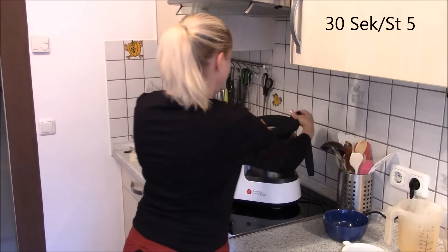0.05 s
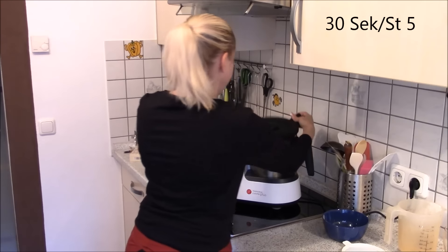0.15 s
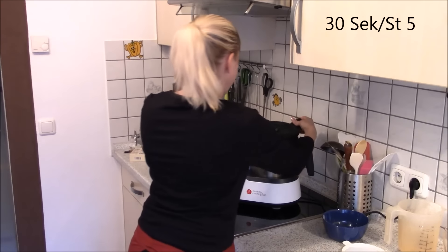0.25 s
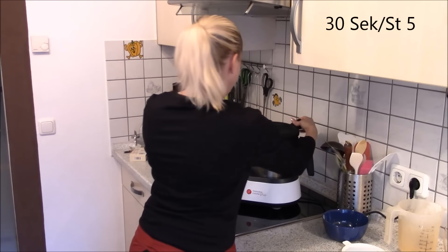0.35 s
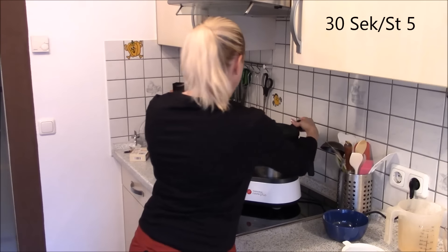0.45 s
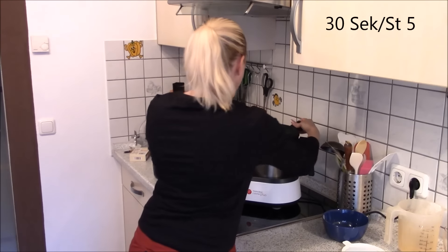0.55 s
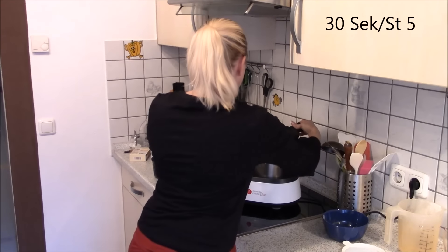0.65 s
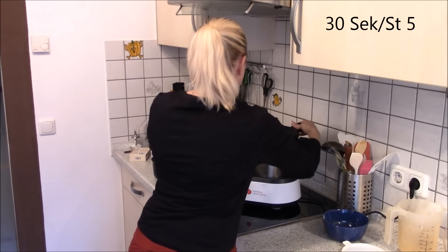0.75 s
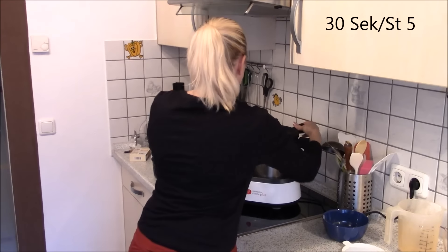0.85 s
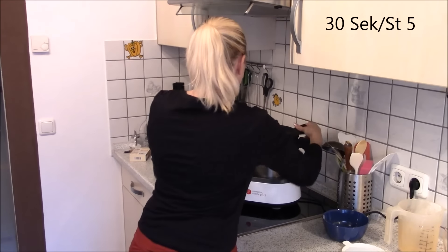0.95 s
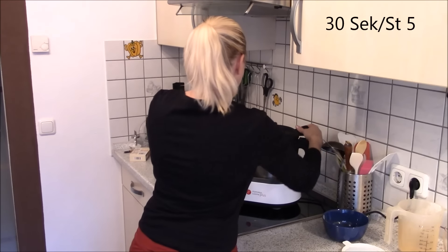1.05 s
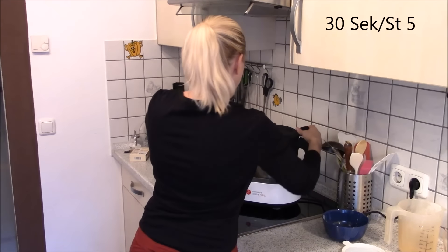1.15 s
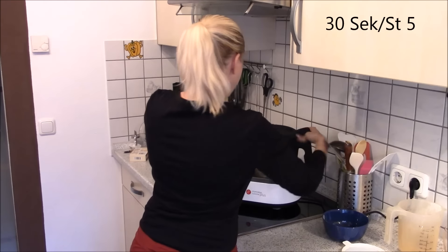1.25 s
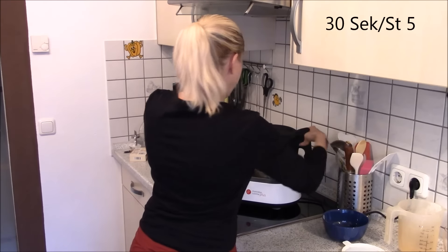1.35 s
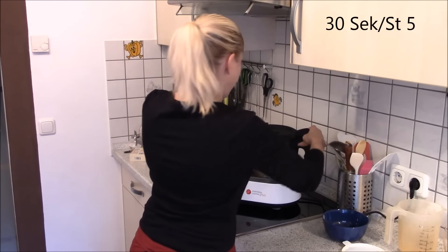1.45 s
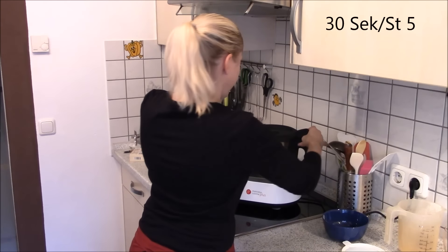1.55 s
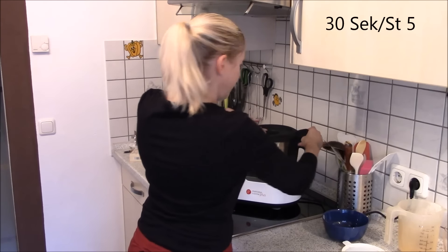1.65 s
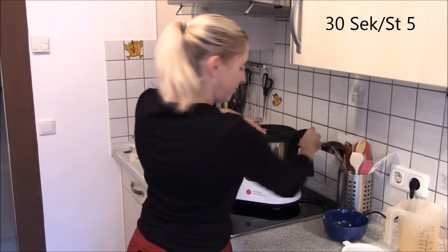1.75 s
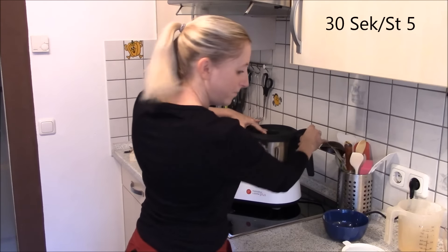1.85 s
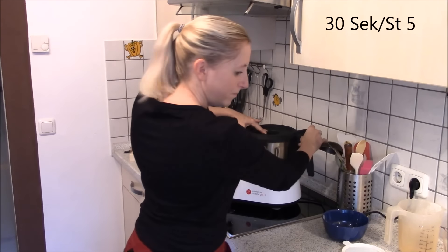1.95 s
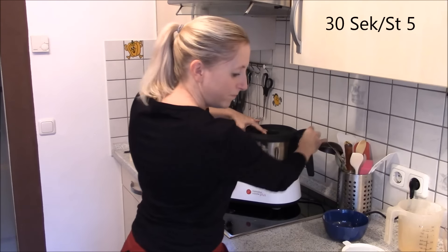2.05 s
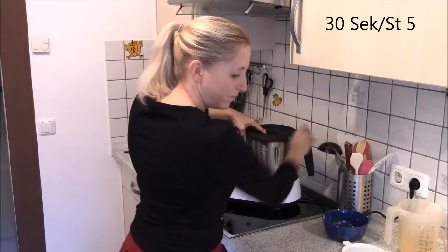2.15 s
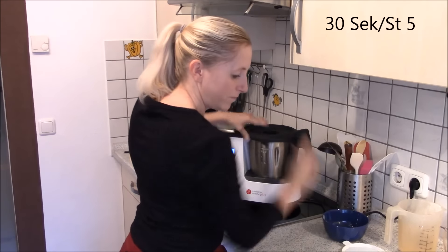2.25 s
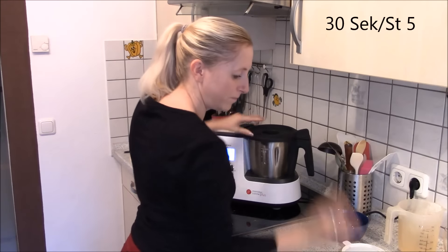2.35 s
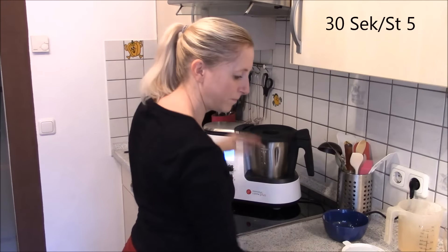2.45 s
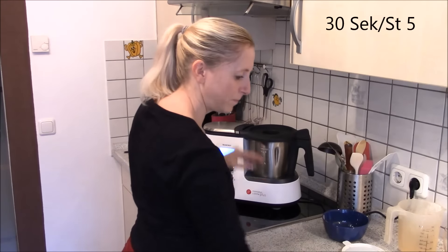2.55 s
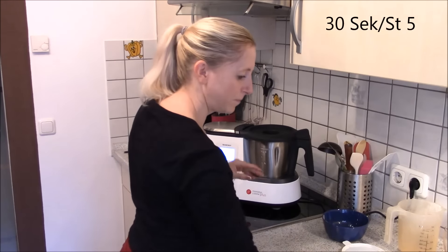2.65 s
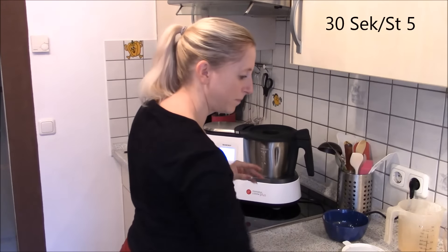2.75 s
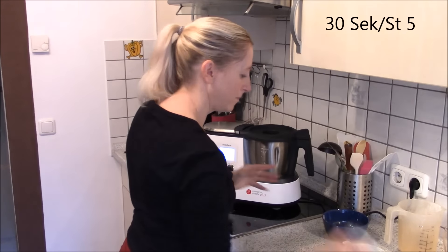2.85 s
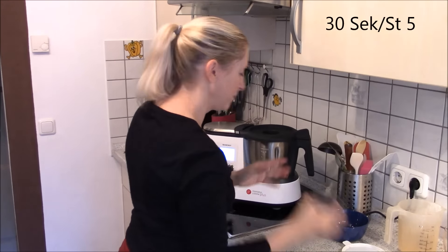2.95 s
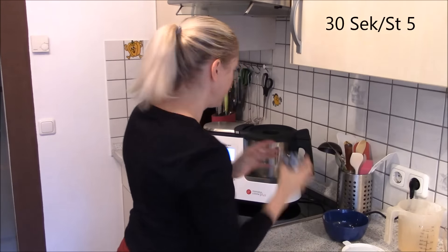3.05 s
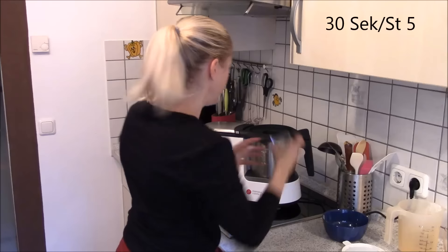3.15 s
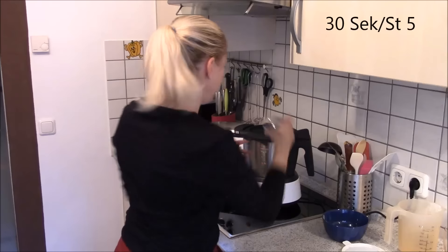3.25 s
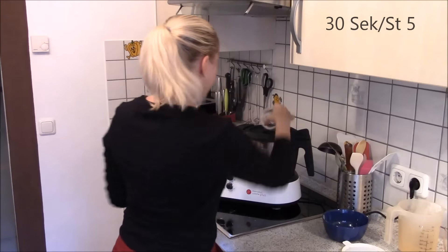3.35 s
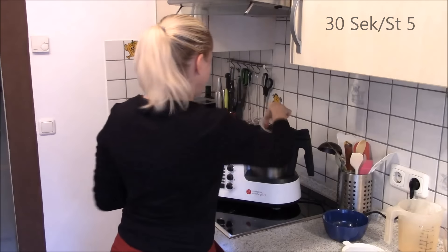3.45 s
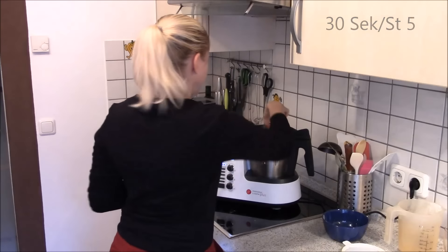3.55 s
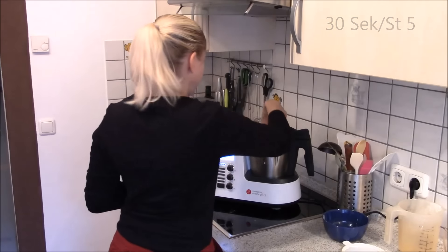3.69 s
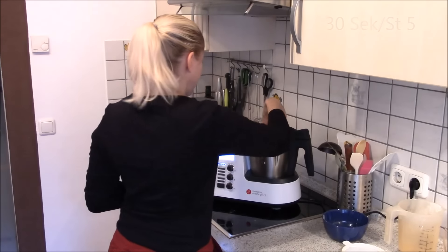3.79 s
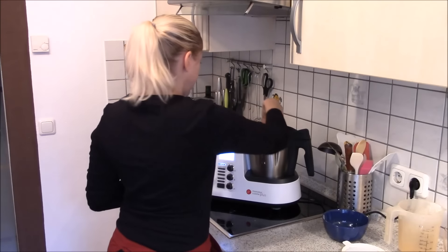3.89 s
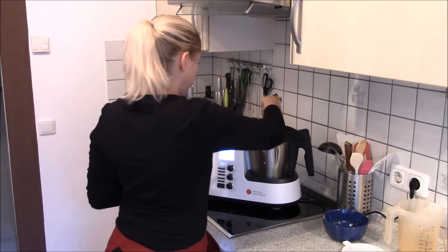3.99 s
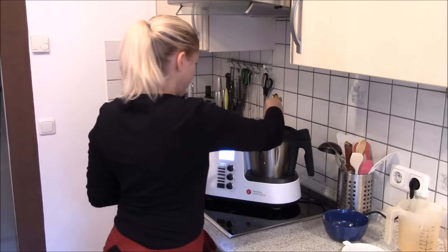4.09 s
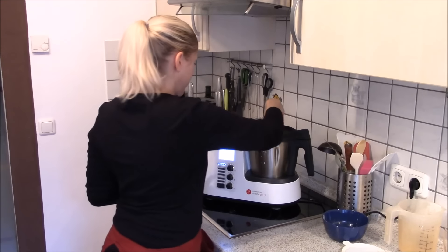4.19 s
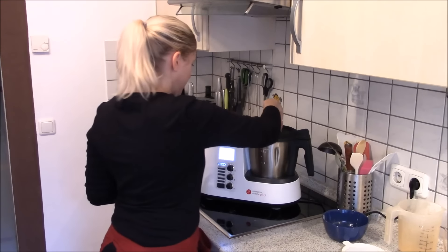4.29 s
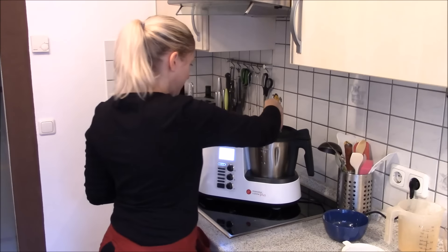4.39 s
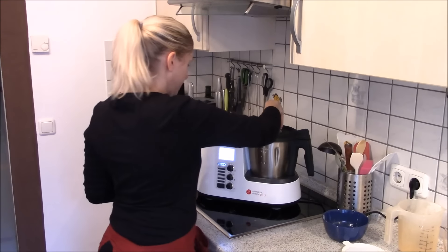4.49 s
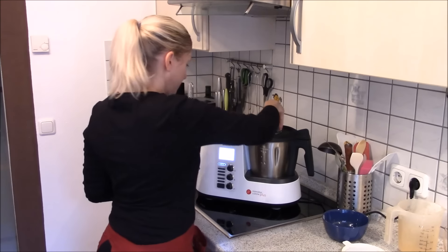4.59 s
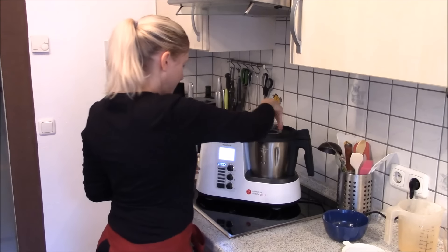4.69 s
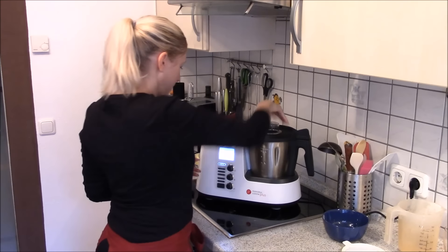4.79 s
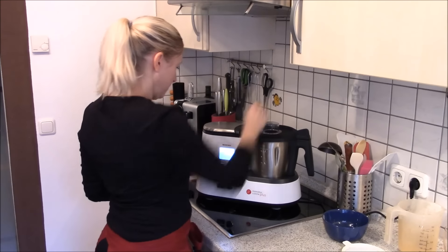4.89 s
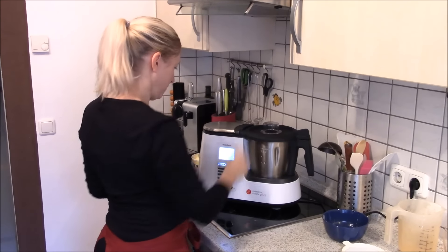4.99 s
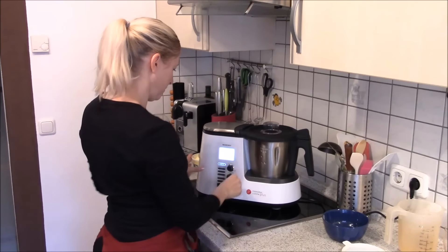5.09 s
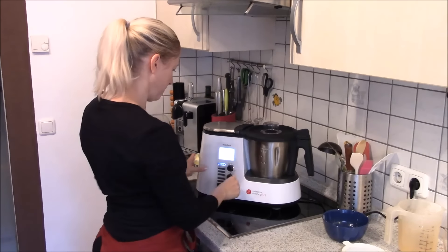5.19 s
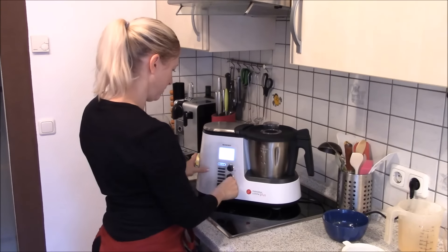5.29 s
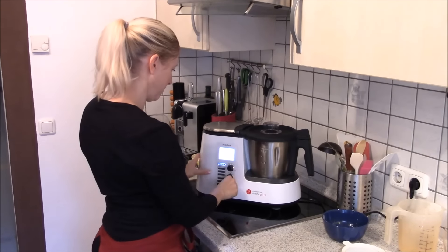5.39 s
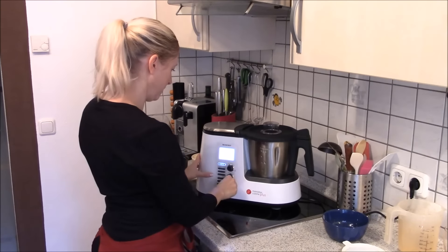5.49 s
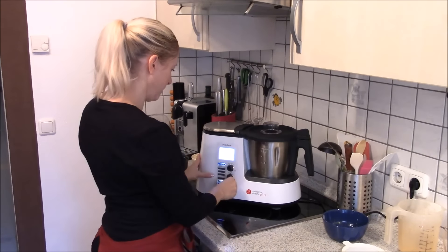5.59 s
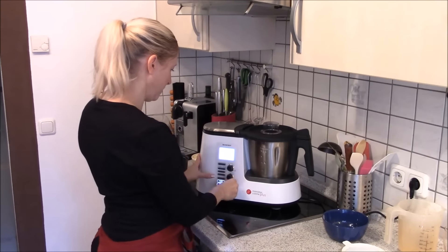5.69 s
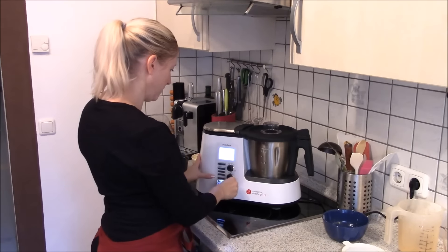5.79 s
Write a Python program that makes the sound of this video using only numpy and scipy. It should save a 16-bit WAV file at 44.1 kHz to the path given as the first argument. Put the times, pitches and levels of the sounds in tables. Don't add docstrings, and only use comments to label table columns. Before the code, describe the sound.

Hollow plastic knocks as a lid is set on a steel bowl, a bright metallic scrape and sharp clack, then more clatter ending in the loudest snap at two seconds. Cloth brushes softly with tiny ticks. A small plastic cup rattles into the lid, knocks and grinds as it is turned, then quiet room hum. Heard about two metres away in a small, reverberant tiled kitchen.

```python
import sys
import numpy as np
from scipy import signal
from scipy.fft import rfft, irfft, next_fast_len
from scipy.io import wavfile
from scipy.ndimage import uniform_filter1d

SR = 44100
rng = np.random.default_rng(int(sys.argv[2]) if len(sys.argv) > 2 else 0)


def pcm_store(signal):
    levels = np.round(np.clip(np.atleast_2d(signal), -1, 1) * 32767)
    wavfile.write(sys.argv[1], SR, levels.astype(np.int16).T)


def boost_factor(decibels):
    exponent = np.asarray(decibels, float) / 20
    return 10 ** exponent


N = 257147
LEAD = next_fast_len(N + 2048, True) - N

# mode_hz, level_db, t60_s
LID_MODES = [(91, -20, 0.24), (251.6, -14.5, 0.15), (307.2, 3, 0.042), (347, 0, 0.047), (462, -6.5, 0.07),
             (575.4, 0, 0.07), (714, 7, 0.027), (833, 7.5, 0.026), (1095, 0, 0.0518), (1264, -5, 0.039),
             (1470, 2, 0.024), (1635, 6, 0.0095), (1790, 4, 0.018), (2355, -6, 0.033), (2450, 5, 0.015),
             (2802, 6, 0.013), (3085, -22, 0.022), (3770, 1.5, 0.025), (5140, -8.5, 0.017),
             (6594, 3, 0.018), (8650, -4, 0.0046)]
# mode_hz, level_db, t60_s
CUP_MODES = [(97.8, -14, 0.11), (215, -5, 0.033), (291.5, 0, 0.053), (334, -8, 0.063), (493.4, -12, 0.097),
             (591, -1, 0.051), (704, 10, 0.015), (886, 7, 0.017), (1130, 2.5, 0.018), (1238, 12, 0.011),
             (1506, 1.5, 0.029), (1660, 8, 0.016), (1950, -3, 0.019), (2465, 1, 0.027), (2950, -17, 0.028),
             (3970, -18, 0.025), (5500, -9, 0.012), (6400, -3, 0.014), (8440, 2, 0.0083)]


def on_log(hz, table):
    table_hz, values = np.transpose(table)
    return np.interp(np.log(np.maximum(hz, 1)), np.log(table_hz), values)


def coloured(x, table):
    size = x.shape[-1]
    gain = boost_factor(on_log(np.fft.rfftfreq(size, 1 / SR), table))
    return irfft(rfft(x) * gain, size)


def band(x, lo_hz, hi_hz):
    return signal.sosfilt(signal.butter(2, [lo_hz, hi_hz], "bandpass", fs=SR, output="sos"), x)


def unit(x):
    return x / np.sqrt(np.mean(x ** 2))


def rings(body, seconds):
    hz, db, t60 = np.transpose(body)[:, :, None]
    t = np.arange(int(seconds * SR)) / SR
    fade = boost_factor(db - 60 * t / np.maximum(t60, .005))
    return hz[:, 0], fade * np.sin(2 * np.pi * hz * t)


def excite(x, body):
    response = rings(body, .4)[1].sum(axis=0)
    response = response / np.sqrt(np.sum(response ** 2))
    return signal.fftconvolve(x, response)[:len(x)]


def blows(hits, edges_hz, thud_fall, strike_fall_down, strike_fall_up):
    thud_hz = 270
    centre_hz = np.sqrt(np.maximum(edges_hz[:-1], 150) * np.array(edges_hz[1:]))
    octave = np.log2(centre_hz / thud_hz)
    s, thud_db, strike_db, pitch = np.transpose(hits)[:, :, None]
    below = np.maximum(pitch - octave, 0)
    above = np.maximum(octave - pitch, 0)
    strike_db = strike_db - strike_fall_down * below - strike_fall_up * above
    power = boost_factor(thud_db - thud_fall * octave) ** 2 + boost_factor(strike_db) ** 2
    return np.hstack([s, 10 * np.log10(power)])


def knocks(hits, body, edges_hz, crack_db, crack_s, spot_db, rise):
    hz, ring = rings(body, .2)
    t = np.arange(ring.shape[1]) / SR
    out = np.zeros(N + LEAD + len(t))
    for s, *band_db in hits:
        weight = boost_factor(spot_db * rng.standard_normal(len(hz))) * rng.choice([-1, 1], len(hz))
        cracks = rng.standard_normal((5, len(t)))
        k = LEAD + int(s * SR)
        for lo, hi, db, crack in zip(edges_hz, edges_hz[1:], band_db, cracks):
            crack = crack * boost_factor(crack_db - 60 * t / crack_s * (hi / 1200) ** 0.39)
            ringing = (weight * ((hz >= lo) & (hz < hi))) @ ring
            part = ringing + band(crack, max(lo, 200), hi)
            part *= 1 - np.exp(-t * hi / rise)
            out[k:k + len(t)] += boost_factor(db) * part / np.abs(part).max()
    return out[:N + LEAD]


def stroke(table):
    swell_db = 30
    t = (np.arange(N + LEAD) - LEAD) / SR
    out = np.zeros((2, N + LEAD))
    for s, swell_s, fade_s, db, above_db in table:
        away = np.maximum((s - t) / max(swell_s, .002), (t - s) / max(fade_s, .002))
        near = away < 2
        out[:, near] += boost_factor(db - swell_db * away[near]) * np.array([[1], [boost_factor(above_db)]])
    return out


def grit(grain_db):
    grain = np.minimum(rng.exponential(size=N + LEAD), 4)
    return unit(rng.standard_normal(N + LEAD) * boost_factor(grain_db * grain))


def spread(mid, other):
    # band_hz, side_minus_mid_db
    width_db = [(60, -26.5), (110, -11), (200, -18), (380, -20.5), (700, -21.5), (1290, -20.5), (2380, -19),
                (4400, -17), (8120, -16), (15000, -17.5)]
    side = coloured(other, width_db)
    return np.array([mid + side, mid - side])


def lid_knocks():
    # start_s, thud_db, strike_db, strike_pitch_octaves (above the thud)
    lid_hits = [(-.02, -17, -17, 3.7), (.153, -18, -14.5, 3.15), (.213, -21, -20, 1.6),
                (.239, -30, -25, 2.26), (.379, -40, -40, 4.7), (.562, -53, -36.5, 3.3),
                (.636, -31.5, -38, 1.6), (.675, -27, -32.5, 1.6), (.687, -31, -28.5, 3.2),
                (.704, -37.5, -39.5, 2.9), (.742, -40, -27.5, 2.3), (1.051, -32, -36.5, 2.1),
                (1.271, -38, -30.5, 3.8), (1.301, -49, -8, 4.3), (1.305, -27, -2.5, 4.0),
                (1.455, -22.5, -25.5, 2.8), (1.474, -23, -29.5, 3.6), (1.55, -42.5, -13.5, 4.9),
                (1.601, -26.5, -22, 1.5), (1.621, -26.5, -28, 3.7), (1.877, -36.5, -28, 3.2),
                (1.951, -16.5, 0, 3.1), (1.967, -39, -4, 2.9)]
    lid_edges_hz = [60, 500, 1200, 3300, 7000, 16000]
    # band_hz, level_db
    lid_wall = [(1000, 1.5), (1600, 2.5), (2050, -0.5), (2700, 3.5), (3350, -1), (3750, -1), (4300, -5),
                (5100, 1), (7000, -1), (10000, 6.5)]
    levels = blows(lid_hits, lid_edges_hz, thud_fall=5.8, strike_fall_down=9.7, strike_fall_up=8.3)
    lid = knocks(levels, LID_MODES, lid_edges_hz, crack_db=16.5, crack_s=0.049, spot_db=2.5, rise=4.2)
    return coloured(lid, lid_wall)


def air():
    # band_hz, level_db (per Hz)
    air_tone = [(22, -16), (45, -16), (70, -28), (110, -11.5), (240, -4), (400, -4), (700, -6.5),
                (1150, -11), (1700, -15), (3000, -19), (6000, -23.5), (10000, -30.5), (13000, -33.5),
                (16000, -40)]
    air_db, hum_db, hum_hz = -55.5, -70, 100
    mid, other = coloured(rng.standard_normal((2, next_fast_len(N))), air_tone)
    hiss = spread(mid, boost_factor(12.0) * other)[:, :N] * boost_factor(air_db) / np.std(mid)
    waver = unit(uniform_filter1d(rng.standard_normal(N), SR // 10))
    hum = boost_factor(hum_db + 1.9 * waver) * np.sin(2 * np.pi * hum_hz * np.arange(N) / SR)
    return hiss + hum


def seats():
    # start_s, level_db, pitch_hz
    bowl_rings = [(.154, -24, 346), (.214, -17.5, 338.3), (.24, -20.5, 340), (1.455, -20.5, 265.5),
                  (1.476, -23, 268), (1.497, -22.5, 255.4), (1.602, -19.5, 275.4), (1.621, -20, 270.4),
                  (1.655, -30.5, 259), (1.795, -35.5, 278), (1.842, -37.5, 272), (1.952, -18.5, 260.5),
                  (.222, -28, 1073), (1.956, -18, 1076), (1.954, -20, 2750), (1.306, -24, 5136),
                  (1.31, -26, 4900), (2.165, -40, 3650), (2.18, -40, 6288), (2.15, -36, 2400)]
    t60_s, rise_s = 0.14, .003
    t = np.arange(SR // 4) / SR
    out = np.zeros(N + LEAD)
    for s, db, hz in bowl_rings:
        k = LEAD + int(s * SR)
        boom = rings([(hz, db, t60_s)], .25)[1][0]
        out[k:k + len(t)] += boom * (1 - np.exp(-t / rise_s))
    return out


def rim_drag():
    # peak_s, swell_s, fade_s, steel_db, plastic_db (above the steel)
    drags = [(.44, .1, 0.13, -70.5, 23), (.912, .03, 0.068, -39.5, 6), (1.17, 0.059, 0.068, -32, 2),
             (1.325, 0.011, 0.069, -16.5, -6), (1.458, 0.048, 0.22, -38.5, 9.5),
             (1.602, 0.0053, 0.017, -31.5, 4.5), (1.678, 0.078, 0.11, -27, -1), (1.8, 0.1, .02, -50.5, 11),
             (1.885, 0.038, 0.23, -41.5, 4), (1.945, .12, .006, -33, -4), (2.15, .04, 0.062, -57, 21.5),
             (2.164, .04, 0.13, -38, -5.5)]
    # mode_hz, level_db, t60_s
    steel_modes = [(1510, -10, .1), (2390, -3, .14), (3135, -9, .1), (3650, -1, .15), (4950, -8, .08),
                   (5140, -7, .08), (5370, -10, .1), (5604, -10, .08), (6288, -1, .11), (6853, -4, .09),
                   (7811, -7, .07), (8199, -10, .08), (8650, -2, .11), (9512, -5, .1), (10220, -8, .08),
                   (10900, -9, .08), (11450, -6, .09), (12180, -8, .08), (13070, -6, .08), (13450, -8, .08),
                   (14300, -10, .07)]
    steel, plastic = stroke(drags)
    slips = grit(2.2)
    sing = excite(steel * slips, steel_modes)
    sing = sing + boost_factor(2.5) * steel * band(slips, 2500, 15500)
    rub = excite(plastic * grit(2.5), LID_MODES[4:17])
    rub = rub + boost_factor(9.5) * plastic * band(slips, 490, 3800)
    return boost_factor(-6.5) * sing + boost_factor(-9.5) * rub


def clock():
    # mode_hz, level_db, t60_s
    case_modes = [(614, -45, .12), (1308, -66, .06), (3450, -62, .05), (3620, -59, .08)]
    first_s, rise_s = 1.176, .006
    beats = np.zeros(N)
    beats[int(first_s * SR)::2 * SR] = 1
    rise = 1 - np.exp(-np.arange(SR // 5) / SR / rise_s)
    tick = rings(case_modes, .2)[1].sum(axis=0) * rise
    return signal.fftconvolve(beats, tick)[:N]


def cloth():
    # peak_s, swell_s, fade_s, sweep_db, rustle_db (above the sweep)
    brushes = [
        (2.58, 0.092, 0.94, -52.5, -20),
        (2.728, 0.25, 0.056, -58, 3),
        (2.89, .15, 0.018, -80, -8),
        (3.175, 0.093, .6, -70, 4),
        (3.386, 0.18, 0.05, -74.5, 13.5),
        (3.442, 0.19, 0.0091, -70, -8),
    ]
    sweep, rustle = stroke(brushes)
    dull = unit(band(grit(4.8), 280, 1180))
    fine = unit(band(grit(8.9), 3300, 7300))
    return boost_factor(-6.0) * (sweep * dull + rustle * fine)


def small_ticks():
    # start_s, thud_db, strike_db, strike_pitch_octaves (above the thud)
    touches = [
        (2.706, -58, -39.5, 3.9),
        (2.779, -64, -38, 4.7),
        (3.177, -56, -49, 3.4),
        (3.271, -64, -45, 4.9),
        (3.354, -62, -41, 4.6),
        (4.984, -55, -41.5, 2.66),
        (4.996, -64, -46, 2.8),
        (3.372, -68, -45, 5.2),
    ]
    # mode_hz, level_db, t60_s
    trinket_modes = [(386, -5, 0.033), (600, 8, 0.31), (1670, -8.5, .025), (2720, 4, 0.023),
                     (3360, 1, 0.013), (5500, -6, .006), (7240, 1, .005), (9650, 1, .004)]
    tick_edges_hz = [60, 500, 1200, 2200, 4500, 10000]
    levels = blows(touches, tick_edges_hz, thud_fall=9.8, strike_fall_down=19, strike_fall_up=6.3)
    return knocks(levels, trinket_modes, tick_edges_hz, crack_db=11, crack_s=0.029, spot_db=-4.0, rise=2.3)


def cup_knocks():
    # start_s, thud_db, strike_db, strike_pitch_octaves (above the thud)
    cup_hits = [(3.464, -56, -29.5, 5.5), (3.506, -24, -19, 2.4), (3.529, -36, -46, 5.1),
                (3.551, -15.5, -19, 2.4), (3.574, -26, -42, 2.5), (3.598, -17.5, -16.5, 1.9),
                (3.628, -34, -33, 1.7), (3.659, -41, -26.5, 1.4), (3.777, -30, -31.5, 1.4),
                (3.831, -38, -31, 1.63), (3.841, -46, -37.5, 1.5), (3.986, -24.5, -19, 2.43),
                (3.995, -21.5, -29, 3.9), (4.1245, -19.5, -9, 2.04), (4.149, -31, -18.5, 2.55),
                (4.51, -30.5, -17.5, 2.04), (4.523, -27, -21.5, 2.35), (4.631, -40, -26, 1.4)]
    cup_edges_hz = [60, 500, 1200, 2200, 4500, 16000]
    levels = blows(cup_hits, cup_edges_hz, thud_fall=5.9, strike_fall_down=5.8, strike_fall_up=10)
    return knocks(levels, CUP_MODES, cup_edges_hz, crack_db=13, crack_s=0.063, spot_db=1.5, rise=3.76)


def cup_twist():
    # peak_s, swell_s, fade_s, rub_db, hiss_db (above the rub)
    twists = [
        (4.005, .012, .2, -58, 14),
        (4.135, .01, .1, -32, -12),
        (3.522, 0.0069, 0.048, -31.5, -34),
        (3.592, .027, .025, -34, -0.5),
        (3.61, .015, 0.27, -58, -16),
        (4.412, 0.022, .16, -31.5, -36),
        (4.516, 0.036, 0.11, -44.5, -32),
    ]
    rub, hiss = stroke(twists)
    slips = grit(2.7)
    grind = excite(rub * slips, CUP_MODES[4:15])
    grind = grind + boost_factor(6.0) * rub * band(slips, 490, 1720)
    grind = grind + boost_factor(8) * rub * band(slips, 53, 134)
    return boost_factor(-4) * grind + boost_factor(-5) * hiss * band(slips, 3800, 8000)


def cup_in_lid():
    # band_hz, level_db
    cup_wall = [(1600, 0), (2200, -1), (2800, -0.5), (3300, -4.5), (3900, -1), (4600, -7.5), (5600, 5.5),
                (7300, 4.5), (9000, 1.5), (12000, 5)]
    return coloured(boost_factor(-4) * cup_knocks() + cup_twist(), cup_wall)


def kitchen(dry):
    # band_hz, t60_s
    decay_s = [(100, 0.51), (300, 0.4), (1000, 0.38), (3000, 0.46), (8000, 0.42), (15000, 0.12)]
    # band_hz, level_db
    echo_db = [(100, 1), (300, -0.5), (1000, 3), (3000, 4.5), (8000, 1.5), (15000, -3)]
    # band_hz, level_db
    mic_tone = [(30, -24.5), (70, -8), (130, -6), (250, 0), (8000, 3.5), (11000, -1), (14000, -7.5),
                (16000, -15.5)]
    first_echo_s, fill_s = 0.0016, 0.00059
    t = np.arange(2 ** 15) / SR
    fill = 1 - np.exp(-np.maximum(t - first_echo_s, 0) / fill_s)
    tails = 0
    for hz in 56 * 2. ** np.arange(9):
        fading = rng.standard_normal((2, len(t))) * fill * boost_factor(-60 * t / on_log(hz, decay_s))
        fading = fading / np.sqrt(np.sum(fading[0] ** 2))
        octave = band(fading, hz / 2 ** .5, hz * 2 ** .5)
        tails = tails + boost_factor(on_log(hz, echo_db)) * octave
    tails = spread(*tails)
    tails[:, 0] = 1
    wet = signal.fftconvolve(dry[None], tails, axes=1)[:, :N + LEAD]
    return coloured(wet, mic_tone)[:, LEAD:]


def scene():
    boom = seats()
    hands = boost_factor(-2.5) * (lid_knocks() + small_ticks())
    hands = hands + cup_in_lid() + rim_drag() + cloth()
    echoing = kitchen(hands + boost_factor(-8.5) * boom)
    return echoing + boom[LEAD:] + air() + clock()


def top_cut(x):
    return signal.sosfilt(signal.butter(12, 16470, fs=SR, output="sos"), x)


def record(dry):
    return top_cut(np.tanh(0.89 * dry) / 0.91)


dry = scene()
out = record(dry)
pcm_store(out)
```